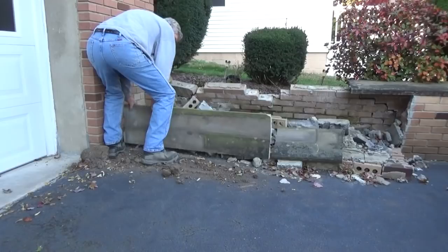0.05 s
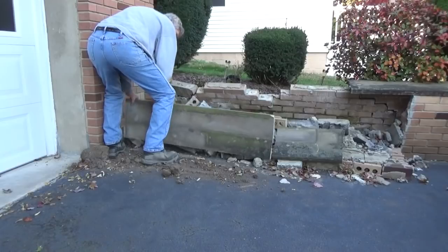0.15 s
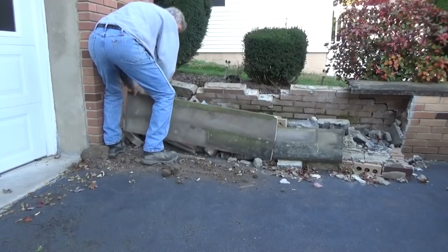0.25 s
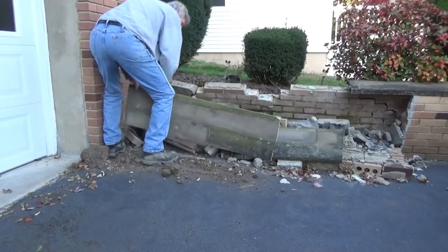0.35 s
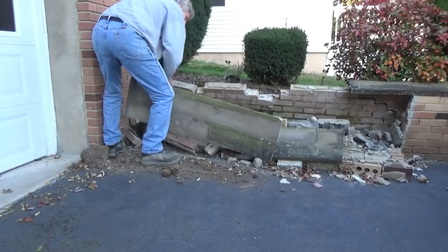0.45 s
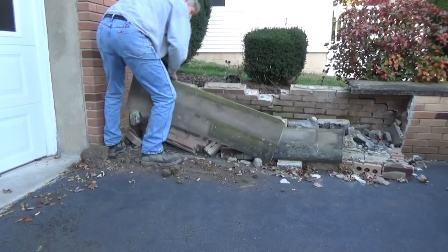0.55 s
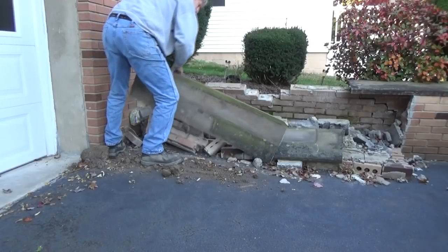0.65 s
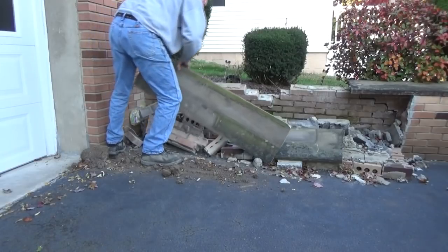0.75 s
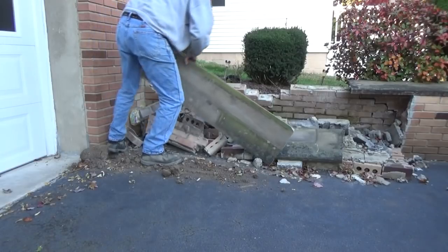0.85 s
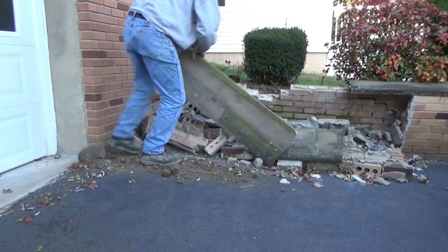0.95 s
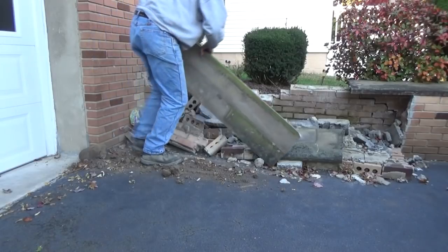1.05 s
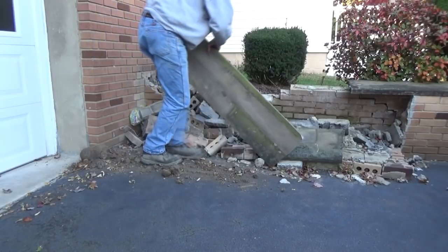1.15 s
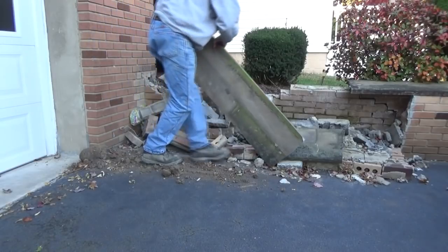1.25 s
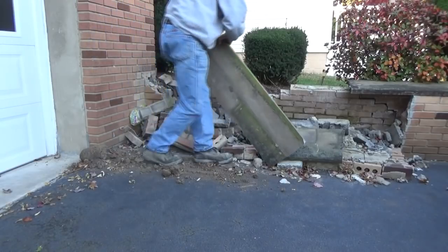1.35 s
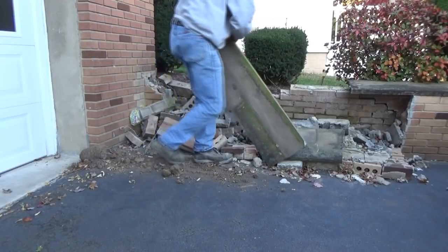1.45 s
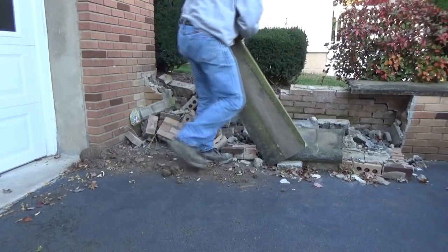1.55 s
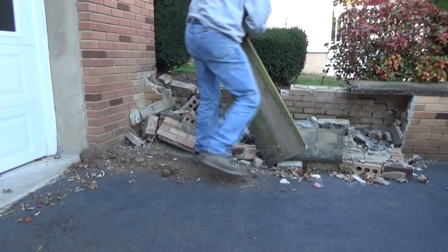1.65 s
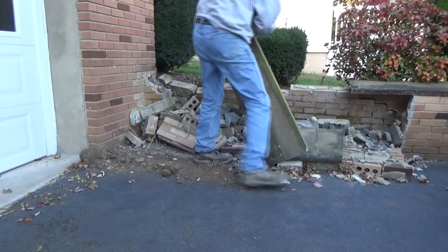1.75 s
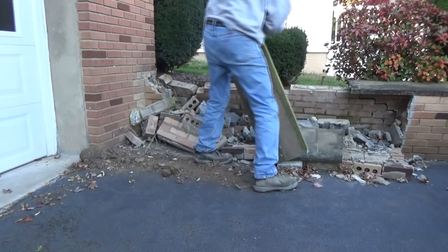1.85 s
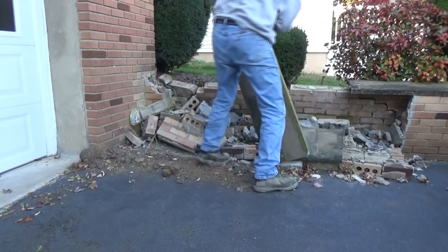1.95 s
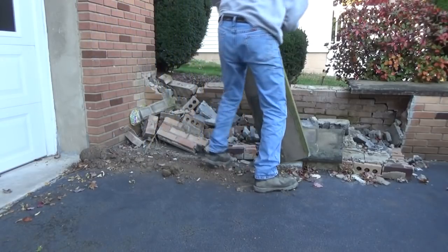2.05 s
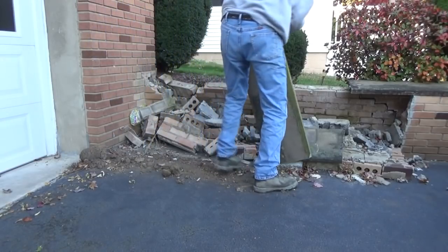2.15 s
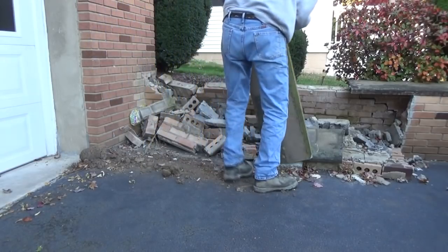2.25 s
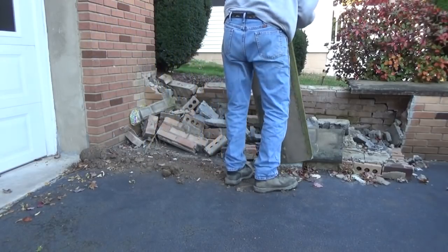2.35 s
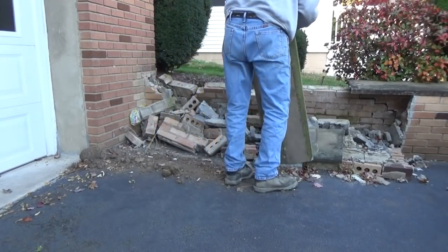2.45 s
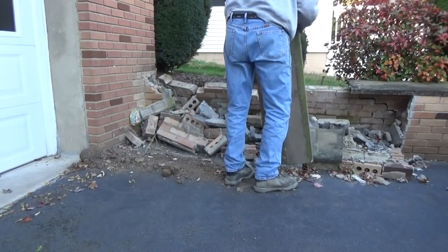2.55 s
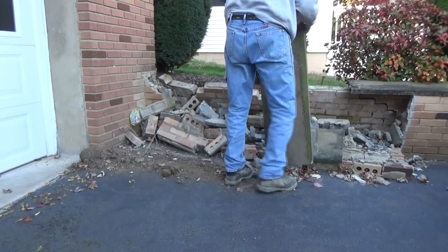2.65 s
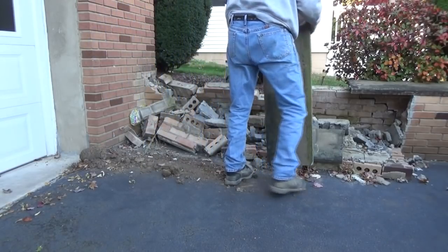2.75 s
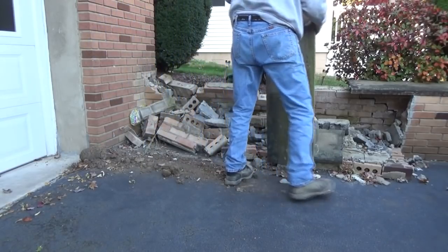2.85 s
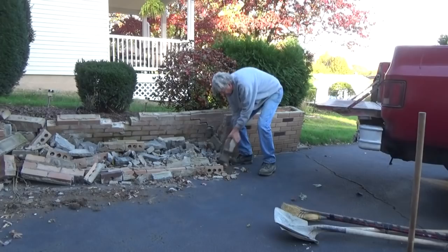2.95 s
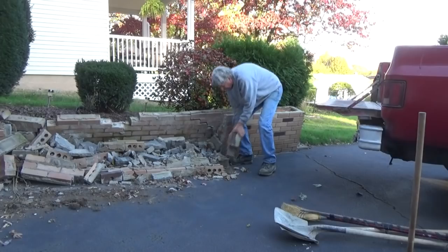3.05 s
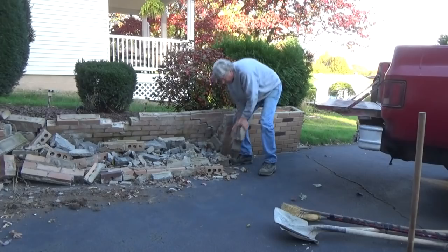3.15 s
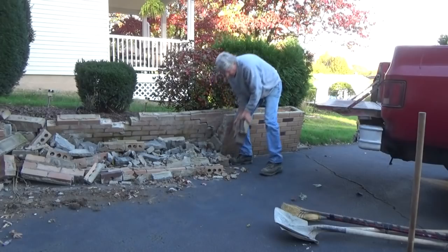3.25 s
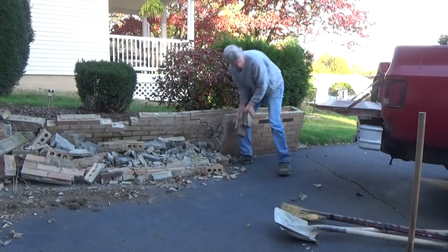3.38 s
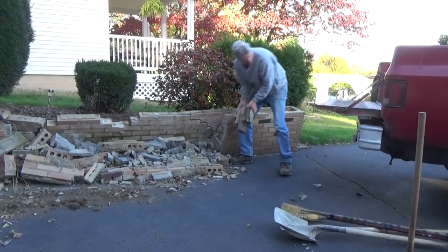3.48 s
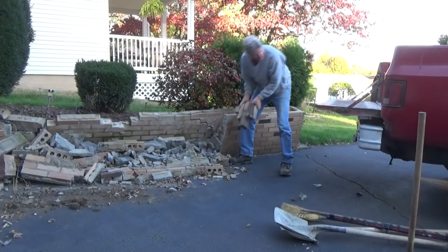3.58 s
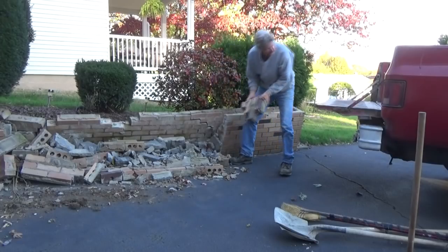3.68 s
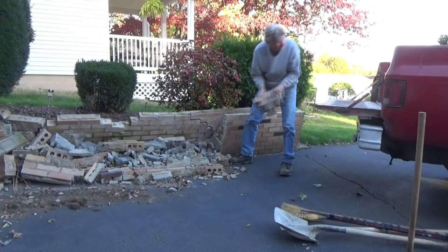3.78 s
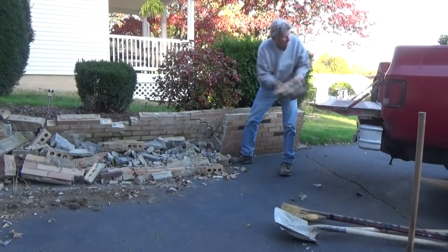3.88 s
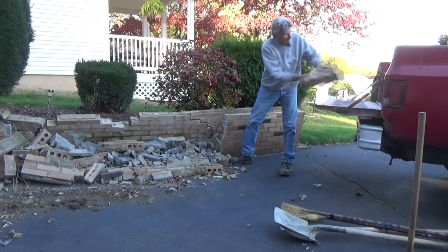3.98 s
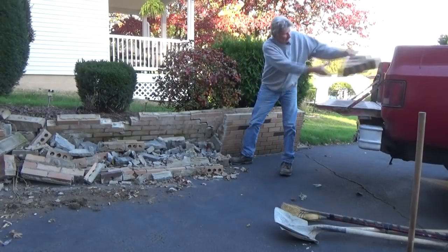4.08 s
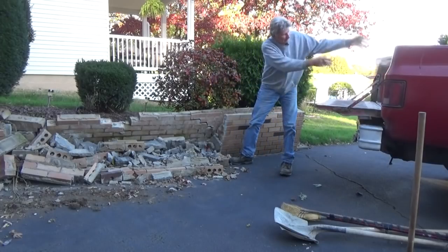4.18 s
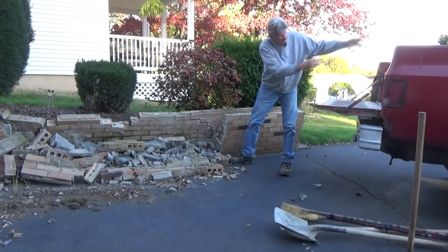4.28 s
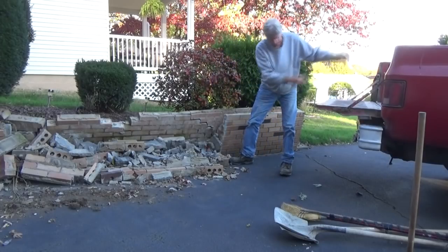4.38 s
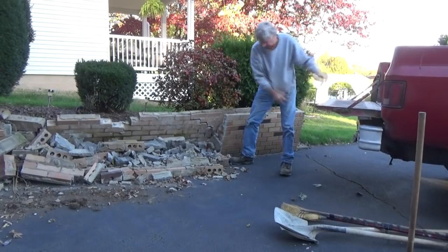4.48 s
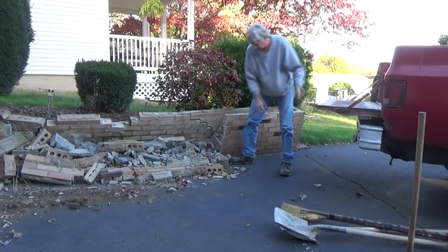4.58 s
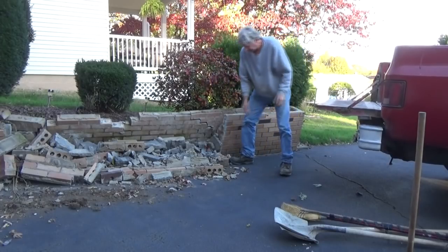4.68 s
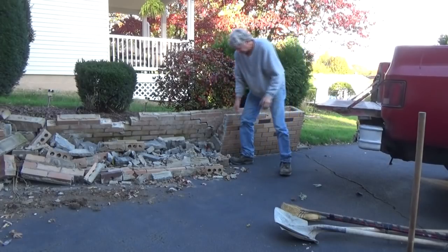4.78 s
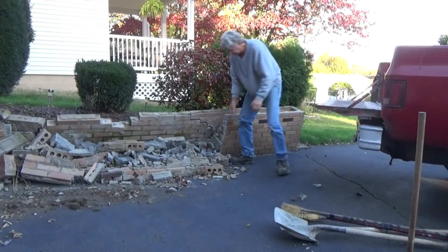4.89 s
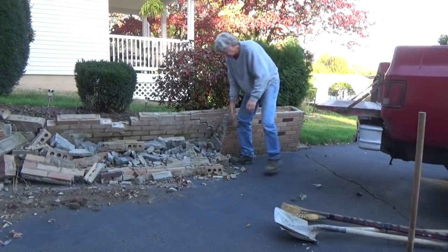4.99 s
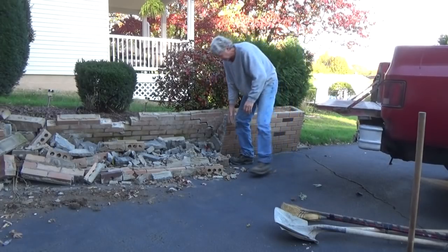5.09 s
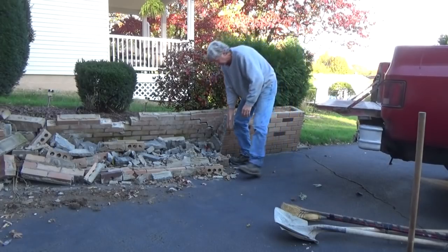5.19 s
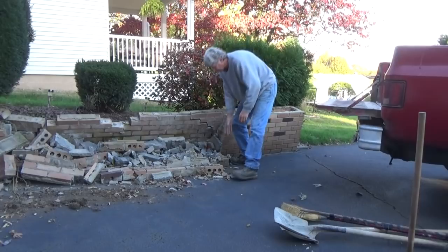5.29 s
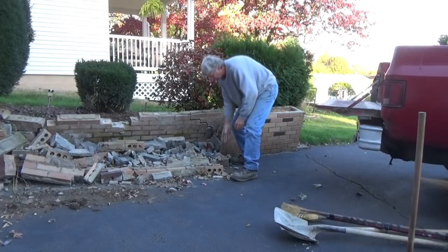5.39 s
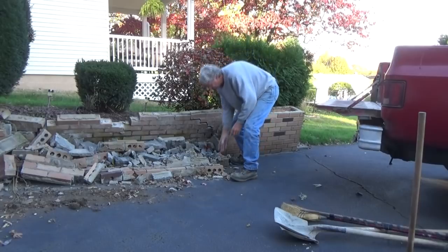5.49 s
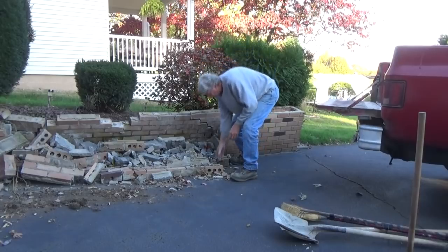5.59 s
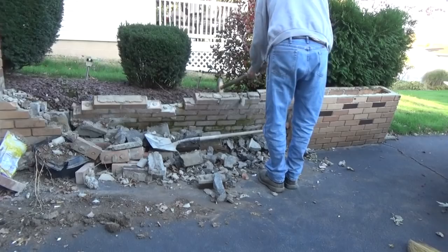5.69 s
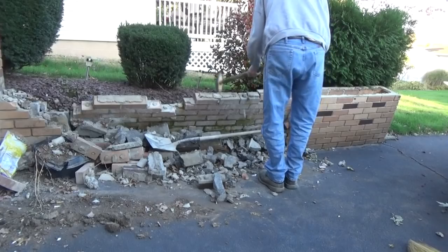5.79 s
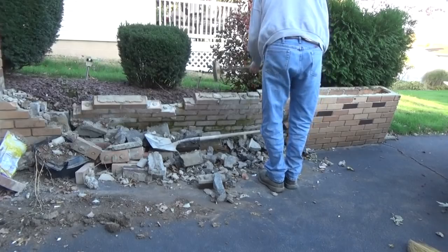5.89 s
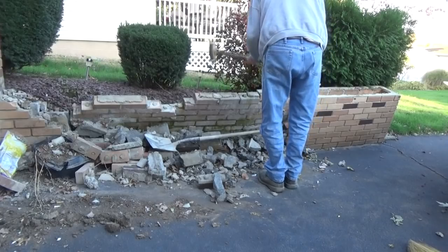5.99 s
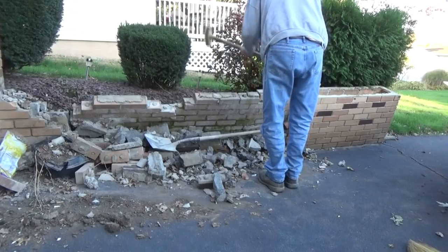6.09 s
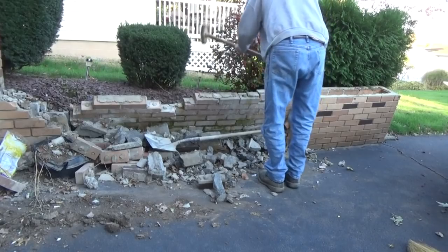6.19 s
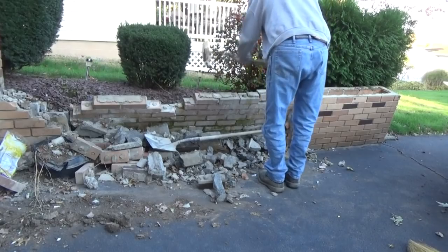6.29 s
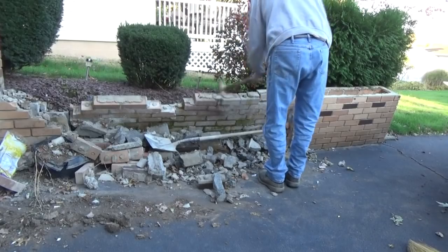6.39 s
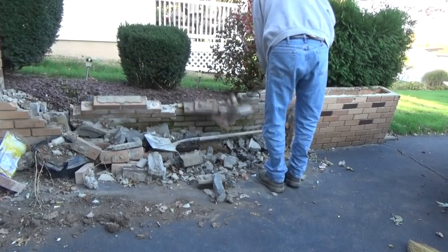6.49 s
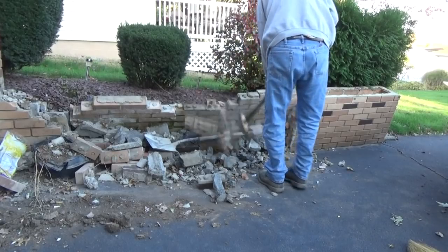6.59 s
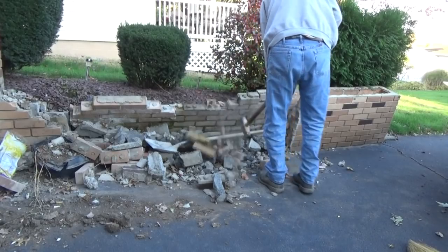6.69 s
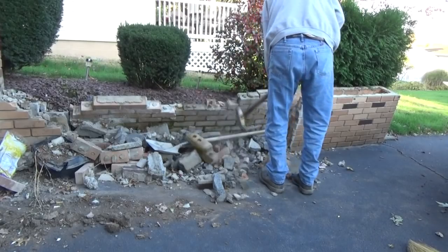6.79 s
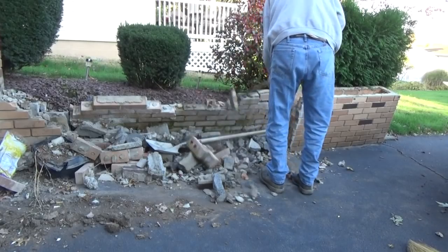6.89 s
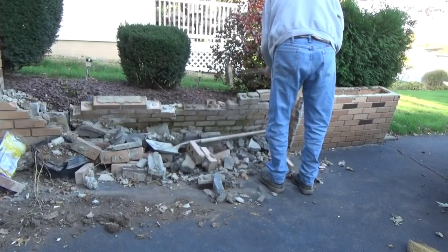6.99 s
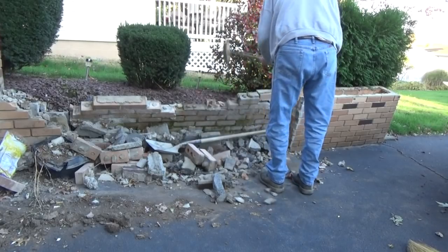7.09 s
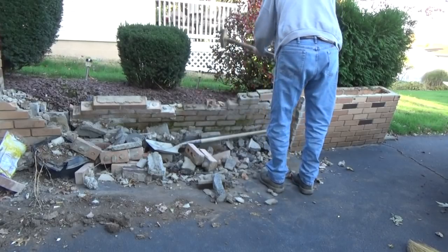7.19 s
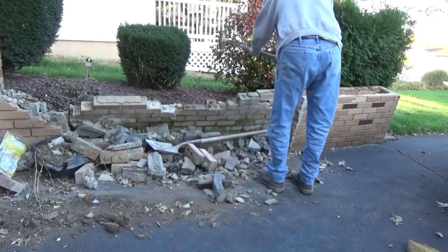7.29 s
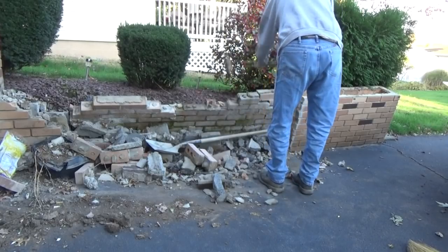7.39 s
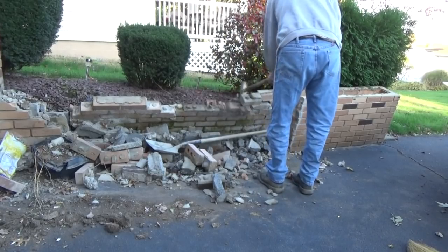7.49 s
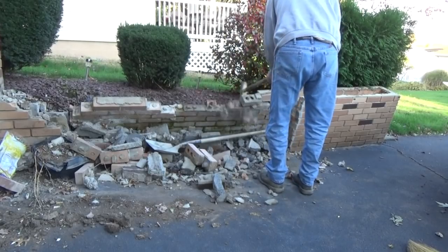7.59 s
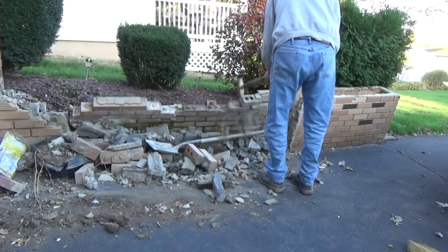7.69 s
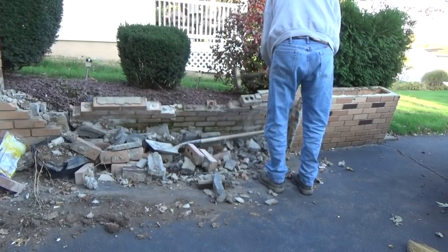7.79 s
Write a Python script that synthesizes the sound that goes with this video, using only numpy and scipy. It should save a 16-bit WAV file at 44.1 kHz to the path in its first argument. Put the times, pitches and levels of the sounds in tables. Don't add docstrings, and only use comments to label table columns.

```python
import sys
import numpy as np
from scipy import signal
from scipy.fft import rfft, irfft
from scipy.io import wavfile
from scipy.ndimage import uniform_filter1d

SR = 44100
rng = np.random.default_rng(int(sys.argv[2]) if len(sys.argv) > 2 else 0)


def digitize_waveform(pressure):
    field = np.atleast_2d(pressure).T
    bounded = np.clip(field, -1, 1)
    quanta = np.round(bounded * 32767).astype(np.int16)
    wavfile.write(sys.argv[1], SR, quanta)


def linear_from_db(decibels):
    return 10 ** (np.asarray(decibels, float) / 20)


N = 345744


def evened(x):
    return x / np.sqrt(np.mean(x ** 2) + 1e-20)


def read(points, hz):
    f, value = np.transpose(points)
    return np.interp(np.log(hz + 1), np.log(f + 1), value)


def add(mix, s, sound):
    part = mix[..., round(s * SR):][..., :sound.shape[-1]]
    part += sound[..., :part.shape[-1]]


def panned(x, db):
    return np.array([x * linear_from_db(db / 2), x * linear_from_db(-db / 2)])


def coloured(x, points):
    hz = abs(np.fft.fftfreq(2048, 1 / SR))
    log_gain = np.log(linear_from_db(np.maximum(read(points, hz), -90)))
    taps = np.fft.ifft(np.exp(np.conj(signal.hilbert(log_gain)))).real[:1024]
    return evened(signal.oaconvolve(x, taps)[:N])


def resonant(x, peaks):
    out = np.zeros(N)
    for hz, width, db in peaks:
        b, a = signal.iirpeak(hz, hz / width, SR)
        once = signal.lfilter(b, a, x)
        out += linear_from_db(db) * signal.lfilter(b, a, once)
    return evened(out)


def impacts(per_s, spread_db):
    chance, size, sign = rng.random((N, 3)).T
    heights = linear_from_db(-spread_db * np.log(size + 1 / 50)) * np.sign(sign - 0.5)
    return evened((chance < per_s / SR) * heights)


def grains(level_db, lo_hz, hi_hz, cycles, per_s, spread_db, count=14):
    struck = impacts(per_s, spread_db) * linear_from_db(level_db)
    piece = rng.integers(0, count, N)
    out = np.zeros(N)
    for k, hz in enumerate(np.geomspace(lo_hz, hi_hz, count)):
        turns = np.arange(1500) * hz / SR
        chime = np.exp(-turns / cycles) * np.sin(2 * np.pi * turns)
        out += signal.oaconvolve(struck * (piece == k), chime / np.linalg.norm(chime))[:N]
    return out


def ring(hz, db, t60):
    t = np.arange(round(t60 * SR)) / SR
    return linear_from_db(db - 60 * t / t60) * np.sin(2 * np.pi * hz * t)


def swells(rows, order, rise_fall, sudden=()):
    t = np.arange(0, N + 16, 16) / SR
    power = 1e-12
    for row in rows:
        start, hold = row[:2]
        db = row[2] + (row[order] if order > 2 else 0)
        at_crack = any(abs(start - crack[0]) < 1 / 250 for crack in sudden)
        rise = 5000 if at_crack else rise_fall[0]
        slope_db = rise * np.maximum(start - t, 0) + rise_fall[1] * np.maximum(t - start - hold, 0)
        power = power + linear_from_db(db - slope_db) ** 2
    return np.interp(np.arange(N) / SR, t, 10 * np.log10(power))


# (from t/s, wash level/dB, engine drone level/dB)
STANDPOINTS = [
    (0, -40, -96),
    (0.096, -47, -47),
    (2.965, -46.5, -62),
    (5.693, -46.5, -56),
]
# (f/Hz, level/dB per Hz)
WASH_SPECTRUM = [(12, -36), (20, -10), (99, 0.5), (287, -8.5), (789, -8.5), (1310, -11.5), (3390, -22.5),
                 (15000, -68)]
# (f/Hz, level/dB per Hz)
HISS_SPECTRUM = [(1500, -19), (4000, -1), (7000, -1.5), (10500, -0.5), (16000, -4)]
# (f/Hz, width/Hz, level/dB)
DRONE_MODES = [(75.5, 22, 1), (43, 15, -5.5)]
# (f/Hz, coherence/1)
COHERENCE = [(60, 1), (240, 1), (950, 0.67), (3770, 0.73), (15000, 0.97)]


def traffic():
    hz = np.fft.rfftfreq(N, 1 / SR)
    a, b, c, d = rng.standard_normal((len(hz), 4)).T
    same = np.clip(read(COHERENCE, hz), -1, 1)
    left = a + 1j * b
    right = same * left + np.sqrt(1 - same ** 2) * (c + 1j * d)
    field = np.array([left, right])
    starts, wash_db, drone_db = np.transpose(STANDPOINTS)
    place = np.maximum(np.searchsorted(starts, np.arange(N) / SR) - 1, 0)
    wash = evened(irfft(field * linear_from_db(read(WASH_SPECTRUM, hz)), N)) * linear_from_db(wash_db[place])
    hiss = evened(irfft(field * linear_from_db(read(HISS_SPECTRUM, hz)), N)) * linear_from_db(-59.0 - 4.5 * (place == 0))
    drone = resonant(rng.standard_normal(N), DRONE_MODES) * linear_from_db(drone_db[place])
    return wash + hiss + drone


# (t/s, f/Hz, level/dB)
UPPER_GLIDE = [
    (3.92, 3950, -75),
    (3.95, 3930, -64),
    (4.1, 3720, -61),
    (4.2, 3600, -62),
    (4.31, 3340, -63),
    (4.35, 3240, -76),
]
# (t/s, f/Hz, level/dB)
LOWER_GLIDE = [
    (3.88, 2960, -75),
    (4.02, 2870, -62),
    (4.12, 2830, -65),
    (4.18, 2770, -59),
    (4.3, 2670, -65),
    (4.36, 2640, -76),
]


def glides():
    out, t = np.zeros((2, N)), np.arange(N) / SR
    for rows in UPPER_GLIDE, LOWER_GLIDE:
        s, hz, db = np.transpose(rows)
        slow_noise = uniform_filter1d(rng.standard_normal((2, N)), 900)
        flutter = 1 + 0.3 * np.array([evened(side) for side in slow_noise])
        level = linear_from_db(np.interp(t, s, db, -200, -200) + 4.5)
        phase = 2 * np.pi * np.cumsum(np.interp(t, s, hz)) / SR
        out += flutter * level * np.sin(phase)
    return out


# (t/s, roll/s, boom level/dB, panel level/dB re boom, rattle level/dB re boom)
BED_STRIKES = [
    (4.513, 0.091, -13, -0.5, -7),
    (4.625, 0.098, -11, -11, -18.5),
    (4.7, 0.12, -11.5, -10, -19.5),
    (4.887, 0.03, -20, -6, -17.5),
    (4.987, 0.017, -12.5, -4.5, -20),
    (5.047, 0.012, -20.5, -6.5, -5),
    (5.128, 0.0081, -33, -16, 3.5),
    (5.206, 0.064, -36, -3.5, -6),
    (5.3, .2, -69, 12, -5),
]
# (f/Hz, width/Hz, level/dB)
FLOOR_MODES = [(62.3, 190, -18), (130.2, 47, -8), (174.7, 57, 1), (238, 87, -9.5)]
# (f/Hz, width/Hz, level/dB)
PANEL_MODES = [(372.4, 57, 4), (526, 56, 0.5), (533, 79, -22), (712, 140, -4), (864, 114, -5),
               (1008, 120, -8.5), (1410, 570, -16)]
# (f/Hz, level/dB per Hz)
RATTLE_SPECTRUM = [(590, -6), (1000, -4), (2310, -11.5), (3850, -14.5), (4720, -18.5), (7950, -25),
                   (15000, -42)]


def trailer():
    strikes = impacts(per_s=400, spread_db=1.0)
    clumps_db = 2.2 * evened(uniform_filter1d(rng.standard_normal(N), 400))
    boom_db = swells(BED_STRIKES, order=2, rise_fall=(6000, 116))
    panels_db = swells(BED_STRIKES, order=3, rise_fall=(9400, 146))
    rattle_db = swells(BED_STRIKES, order=4, rise_fall=(11000, 214)) + clumps_db
    boom = resonant(strikes, FLOOR_MODES) * linear_from_db(boom_db)
    panels = resonant(strikes, PANEL_MODES) * linear_from_db(panels_db)
    rattle = coloured(impacts(per_s=2200, spread_db=0.0), RATTLE_SPECTRUM) * linear_from_db(rattle_db)
    return panned(boom + panels + rattle, 1.8)


# (t/s, hold/s, wall level/dB, crack level/dB re wall, ground level/dB re wall)
HAMMER_BLOWS = [
    (6.48, 0.035, -16, -3.5, -5.5),
    (7.56, .03, -15.5, -5.5, -9.5),
]
# (f/Hz, width/Hz, level/dB)
WALL_MODES = [(322, 270, -5), (457, 214, 5), (672, 110, 5.5), (935, 350, -1.5), (1150, 600, -3)]
# (f/Hz, level/dB per Hz)
MORTAR_SPECTRUM = [(710, -5), (1200, -7), (1530, -15), (2160, -3), (5070, -13), (9050, -18), (14600, -25),
                   (16300, -98)]


def blows():
    wall_db = swells(HAMMER_BLOWS, order=2, rise_fall=(9300, 180))
    crack_db = swells(HAMMER_BLOWS, order=3, rise_fall=(14000, 143))
    ground_db = swells(HAMMER_BLOWS, order=4, rise_fall=(3900, 143))
    ground_modes = [(95, 40, 5.7), (182, 59, 12.0)]  # (f/Hz, width/Hz, level/dB)
    wall = resonant(impacts(per_s=530, spread_db=1.0), WALL_MODES) * linear_from_db(wall_db)
    crack = coloured(impacts(per_s=5000, spread_db=3.0), MORTAR_SPECTRUM) * linear_from_db(crack_db)
    ground = resonant(rng.standard_normal(N), ground_modes) * linear_from_db(ground_db)
    return panned(wall + crack + ground, 1.2)


# (f/Hz, level/dB, t60/s)
HEAD_MODES = [(8800, -34.5, 0.59), (12250, -49, .28)]


def hammer_head():
    out = np.zeros((2, N))
    for blow in HAMMER_BLOWS:
        for mode in HEAD_MODES:
            add(out, blow[0], panned(ring(*mode), 3.5))
    return out


# (t/s,
# f/Hz, level/dB, t60/s)
SINGLE_RINGS = [(5.79, 2950, -29.5, 0.092), (6.057, 2950, -22, 0.042), (6.844, 1250, -27, 0.3),
                (6.855, 856, -18, 0.26), (5.79, 6000, -34, .05), (6.732, 1180, -14, 0.05),
                (6.765, 1800, -16, 0.07), (7.414, 6200, -23.5, 0.015), (4.99, 417, -12, 0.17),
                (4.995, 520, -16, 0.15), (5.773, 6100, -36, .04), (5.717, 4400, -32, .03),
                (5.716, 8200, -32, .025), (5.865, 3400, -42, .08), (6.055, 4400, -26, .04),
                (6.07, 3000, -28, .09), (6.31, 4600, -30, .04), (6.378, 3000, -35, .05),
                (6.731, 600, -15, .08), (6.769, 3200, -18, .04), (6.712, 3200, -19, .06),
                (6.72, 4050, -22, .05), (6.81, 2223, -14, .35), (6.8, 3750, -22, .08), (6.995, 3650, -22, .03),
                (7.17, 3050, -27, .08), (7.18, 3600, -24, .07), (7.185, 3300, -24, .06),
                (7.208, 4300, -26, .04), (7.516, 3500, -36, .04), (5.349, 2600, -26, .1),
                (5.38, 2600, -40, .12), (2.55, 2900, -43, .35), (2.5, 1850, -44, .5), (2.88, 450, -42, .12),
                (2.07, 1550, -28, .08), (1.245, 1350, -30, .08), (1.18, 900, -27, .06), (7.575, 400, -18, .2),
                (6.795, 340, -20, .3), (7.818, 1600, -11, .1), (7.818, 2562, -15, .06),
                (7.818, 3400, -18, .03), (6.74, 2400, -16, .05), (6.755, 1600, -17, .05),
                (6.83, 5500, -20, .04), (7.205, 300, -27, .1), (4.1, 1780, -56, .6), (7.585, 520, -17, .2),
                (4.526, 380, -13, .1)]
# (f/Hz, level/dB, t60/s)
LONG_BRICK_MODES = [(554, -21, 0.46), (730, -16.5, 0.36), (1760, -24, 0.062), (2223, -11, 0.29),
                    (2606, -20, 0.17), (3000, -20, .07), (5300, -21, 0.06)]
# (f/Hz, level/dB, t60/s)
SHORT_BRICK_MODES = [(860, -26, .2), (1200, -23, .05), (1630, -17, .08), (1820, -14, 0.06), (2090, -15, .1),
                     (2300, -18.5, 0.11), (2690, -24, 0.074), (2700, -20, 0.095)]


def bricks():
    out = np.zeros((2, N))
    for s, hz, db, t60 in SINGLE_RINGS:
        add(out, s, panned(ring(hz, db, t60), 1.6))
    long_landings = [(6.795, -1)]  # (t/s, level/dB)
    short_landings = [(7.779, -2.5), (7.817, -0.5)]
    for modes, landings in (LONG_BRICK_MODES, long_landings), (SHORT_BRICK_MODES, short_landings):
        for s, fall_db in landings:
            for hz, db, t60 in modes:
                add(out, s, panned(ring(hz, db + fall_db, t60), 1.6))
    return out


# (t/s, peak level/dB, f/Hz, t60/s)
LUMP_THUDS = [(0.204, -33, 347, 0.062), (0.532, -38, 195, 0.14), (0.816, -32, 754, 0.14),
              (0.931, -35, 885, 0.08), (1.176, -25, 480, 0.064), (1.418, -27, 196, 0.046),
              (1.974, -29, 250, 0.085), (2.042, -28, 683, 0.024), (5.703, -21.5, 184, 0.059),
              (6.783, -30, 229, 0.092), (1.023, -35, 199, .12), (1.882, -29, 291, .06),
              (2.045, -33, 151, .15), (2.38, -34, 151, .15), (1.312, -37, 261, .08)]


def thuds():
    out = np.zeros((2, N))
    for s, db, hz, t60 in LUMP_THUDS:
        add(out, s, panned(ring(hz, db + 4.0, t60) + ring(hz * 1.6, db - 9, t60), 0.74))
    return out


# (t/s, peak level/dB, f/Hz)
SLAB_TICKS = [(0.0976, -36, 4870), (0.1259, -38, 4910), (0.1447, -37, 4910), (0.1844, -16, 9450),
              (0.3777, -40, 5100), (0.5172, -26, 2800), (0.5234, -20, 3010), (0.5993, -23, 2520),
              (0.9211, -26, 3170), (1.104, -31, 4910), (1.1808, -12, 7130), (1.2611, -16, 10270),
              (1.294, -17, 10440), (1.3609, -16, 10270), (1.4219, -9, 4260), (1.4662, -29, 3060),
              (1.4991, -31, 9950), (1.5081, -27, 9450), (1.5464, -34, 8230), (1.5839, -34, 9780),
              (1.6324, -31, 9930), (1.646, -29, 9450), (1.8647, -28, 8590), (1.8983, -8, 10160),
              (1.911, -12, 2930), (1.9792, -22, 5880), (2.0505, -18, 1610), (2.1404, -26, 9500),
              (2.2847, -17, 3490), (2.3174, -15, 3400), (2.3782, -17, 4910), (2.4196, -15, 8290),
              (2.4539, -22, 1850), (2.7734, -20, 3210), (2.9478, -32, 3230), (2.9676, -29, 5430)]
# (t/s, peak level/dB, f/Hz)
LATER_TICKS = [(5.3262, -13, 1890), (5.3301, -22, 1960), (5.3426, -24, 5660), (5.3504, -14, 2540),
               (5.7168, -21, 8050), (5.8364, -30, 9110), (5.9601, -26, 7430), (6.027, -26, 2430),
               (6.0469, -28, 2220), (6.086, -23, 5710), (6.1259, -23, 5430), (6.1646, -27, 4350),
               (6.1693, -23, 4310), (6.2089, -23, 10770), (6.2176, -18, 5920), (6.2628, -22, 4410),
               (6.3013, -26, 4460), (6.3107, -23, 4480), (6.6278, -22, 2990), (6.6973, -18, 7770),
               (6.7031, -13, 7800), (6.7313, -15, 2730), (6.7428, -8, 2520), (6.7599, -11, 2410),
               (6.7711, -8, 2580), (6.7818, -9, 2070), (6.8275, -7, 2220), (6.8378, -10, 2240),
               (7.0686, -15, 2800), (7.1357, -21, 5860), (7.1857, -15, 3380), (7.2083, -16, 4200),
               (7.2926, -30, 2800), (7.3919, -33, 3100), (7.431, -27, 5940), (7.4854, -30, 11300)]


def ticks():
    out, t = np.zeros(N), np.arange(800) / SR
    snap = np.exp(-t / 0.00012) * np.sin(2 * np.pi * 4500 * t)
    for s, db, hz in SLAB_TICKS + LATER_TICKS:
        tone = np.sin(2 * np.pi * hz * t)
        overtone = 0.4 * np.sin(2 * np.pi * min(hz * 1.9, 14000) * t)
        stone = np.exp(-t * hz / 3.5) * (tone + overtone)
        add(out, s, linear_from_db(db - 1.5) * (stone + 1.25 * snap))
    return panned(out, 0.4)


# (t/s, peak level/dB, centre f/Hz)
SLAB_KNOCKS = [(0.156, -9, 9700), (0.1758, -16.5, 9500), (0.205, -17, 7000), (.232, -23, 5540),
               (0.276, -20.5, 4560), (.341, -29, 5050), (0.9429, -14, 4860), (1.049, -28, 9500),
               (1.155, -22, 8500), (1.1785, -20, 2670), (1.2413, -14, 10000), (1.321, -13, 9800),
               (1.4222, -16, 3960), (1.661, -18.5, 9800), (1.675, -23, 10500), (1.8925, -4, 9700),
               (2.2413, -16, 7300), (2.297, -10, 3380), (2.3666, -22, 4000), (2.423, -22, 6000),
               (2.6872, -16.5, 9920), (2.7853, -11, 5300), (2.8097, -14, 5280)]
# (t/s, peak level/dB, centre f/Hz)
THROW_KNOCKS = [(2.9758, -24, 4630), (3.137, -19.5, 3770), (3.183, -12, 9000), (3.219, -22.5, 6000),
                (3.477, -24, 3950), (4.089, -22, 9750), (4.5125, -11, 1740), (5.0474, -15, 2020),
                (5.3222, -26, 3000), (5.3483, -10, 2490), (5.567, -25, 9900)]
# (t/s, peak level/dB, centre f/Hz)
BRICKWORK_KNOCKS = [(5.7028, -23, 2150), (5.7943, -24, 2830), (5.896, -23, 3060), (6.003, -22.5, 4020),
                    (6.0545, -9, 8060), (6.099, -17, 4430), (6.1875, -23, 3210), (6.2285, -15.5, 7500),
                    (6.3495, -11, 10670), (6.4778, -3.5, 1770), (6.668, -15.5, 2870), (6.7122, -6, 5100),
                    (6.768, -8, 2380), (6.9941, -14.5, 8800), (7.052, -19, 2340), (7.178, -12.5, 3300),
                    (7.2042, -15, 3520), (7.351, -23.5, 2500), (7.3995, -19, 10070), (7.4715, -22, 5240),
                    (7.5558, -6, 2400), (7.7789, -4, 2020), (7.818, -7, 2300)]


def knocks():
    out, t = np.zeros((2, N)), np.arange(2000) / SR
    cracks = SLAB_KNOCKS + THROW_KNOCKS + BRICKWORK_KNOCKS
    grits = rng.standard_normal((len(cracks), 2000))
    sides = rng.normal(0.4, 1.1, len(cracks))
    soft = signal.butter(2, 11000, fs=SR)
    contact = 2.24 * np.exp(-t / 0.00013) * np.sin(2 * np.pi * 5000 * t)
    for (s, db, hz), grit, pan_db in zip(cracks, grits, sides):
        body = evened(signal.lfilter(*signal.iirpeak(hz, 2.5, SR), grit))
        chime = np.sin(2 * np.pi * hz * t)
        burst = 0.88 * body + 0.24 * signal.lfilter(*soft, grit) + 0.6 * chime + contact
        t60 = 0.028 * (hz / 3000) ** -0.19
        add(out, s, panned(burst * linear_from_db(db - 8.5 - 60 * t / t60), pan_db))
    return out


# (t/s, hold/s, sand level/dB, chip level/dB re sand, lump level/dB re sand)
SLAB_SLIDES = [(.098, 0.27, -53, -17, -8), (.155, 0.087, -38.5, -31, -19), (.3, 0.01, -45.5, 5.5, 9),
               (.529, 0.018, -32, 2, -0.5), (.6, .14, -51, 7, 9.5), (.82, 0.066, -48, 5, 11),
               (.934, 0.015, -37.5, -2.5, 1.5), (.98, 0.045, -47.5, -0.5, 6), (1.05, 0.23, -45, -23, -21),
               (1.179, 0.0075, -33.5, 2, 3), (1.24, 0.18, -29.5, -10, -14), (1.45, 0.076, -41, -1, -2.5),
               (1.58, 0.13, -44.5, -21, -19), (1.76, 0.1, -46, -3.5, -0.5), (1.89, 0.011, -24, -14, -11.5),
               (1.97, 0.12, -32.5, -2, -7.5), (2.14, 0.2, -34, -8.5, -24), (2.28, .04, -31, -3.5, -13),
               (2.366, 0.061, -29.5, -7, -14.5), (2.5, 0.11, -56, 6, 4), (2.687, 0.014, -35, -5.5, -15),
               (2.75, 0.068, -43.5, -0.5, -2), (2.86, 0.063, -47.5, -2.5, 4.5)]
# (t/s, hold/s, sand level/dB, chip and lump level/dB re sand)
THROW_SLIDES = [(2.974, .01, -35, -5.5, -10.5), (3.02, 0.02, -42, -10, -13), (3.09, .01, -45.5, -3, -6),
                (3.146, 0.053, -34.5, -3.5, -15), (3.25, 0.15, -45.5, -9, -10),
                (3.388, 0.016, -35, -11.5, -25), (3.475, 0.033, -30.5, -15, -13.5),
                (4.04, 0.0091, -51, -16, -14), (4.088, 0.009, -41.5, -15, -25),
                (4.13, 0.044, -47.5, -3, -14), (5.326, 0.031, -43.5, 6, 1.5), (5.5, 0.0046, -48.5, -9, 8),
                (5.558, 0.013, -55, 2, 15)]
# (t/s, hold/s, sand level/dB, chip and lump level/dB re sand)
BRICKWORK_SLIDES = [(5.703, .025, -38.5, 4.5, 10.5), (5.76, 0.09, -44.5, -2.5, 0),
                    (5.896, 0.067, -39, -7, -9), (6.004, 0.015, -40, 2, -8),
                    (6.055, 0.013, -28.5, -12, -9.5), (6.1, 0.12, -41.5, -6.5, -10),
                    (6.2, 0.062, -34, -6.5, -6.5), (6.28, 0.038, -41, -7.5, -17),
                    (6.348, 0.0068, -36, -3.5, -7), (6.4, 0.047, -51.5, -4, -6),
                    (6.66, 0.012, -36, -12, -16), (6.707, 0.03, -21.5, -2.5, -25),
                    (6.738, 0.098, -23.5, 6, 0), (6.87, 0.096, -27.5, -2.5, -4.5),
                    (6.98, .2, -33, -2.5, -5), (7.239, 0.056, -43.5, 1, 5), (7.349, 0.0068, -44.5, 5.5, -4),
                    (7.4, .08, -43, -12, -11), (7.5, 0.025, -51, -8, 0), (7.781, 0.071, -31.5, 6, -9)]
# (f/Hz, level/dB per Hz)
SAND_SPECTRUM = [(1470, -20.5), (2500, -2), (3500, 0), (4160, 1), (7500, -2.5), (10300, 2.5), (15100, -8.5),
                 (16300, -12)]
# (f/Hz, width/Hz, level/dB)
SLAB_MODES = [(207.4, 22, 1.5), (369, 46, 0.5), (673, 61, 0), (802, 37, 2), (898, 110, -2),
              (1430, 270, -6.5), (1790, 140, -3)]


def rubble():
    slides = SLAB_SLIDES + THROW_SLIDES + BRICKWORK_SLIDES
    cracks = SLAB_KNOCKS + THROW_KNOCKS + BRICKWORK_KNOCKS + SLAB_TICKS[:1]
    sand_db = swells(slides, order=2, rise_fall=(300, 308), sudden=cracks)
    chips_db = swells(slides, order=3, rise_fall=(620, 360), sudden=cracks)
    lumps_db = swells(slides, order=4, rise_fall=(300, 230), sudden=cracks)
    clumps_db = 2.3 * evened(uniform_filter1d(rng.standard_normal(N), 500))
    sand = coloured(impacts(per_s=6000, spread_db=3.6), SAND_SPECTRUM) * linear_from_db(sand_db + clumps_db)
    flakes = grains(sand_db - 10.5, 3202, 9830, cycles=19.0, per_s=250, spread_db=6.0)
    clinks = grains(chips_db - 5, 800, 5500, cycles=12.0, per_s=300, spread_db=4.0)
    chips = grains(chips_db + 0.7 * clumps_db, 980, 3730, cycles=3.5, per_s=2500, spread_db=5.0)
    lumps = grains(lumps_db - 2, 170, 900, cycles=2.5, per_s=1800, spread_db=2.5)
    dragged = np.arange(N) / SR < 2.5
    slab = resonant(impacts(per_s=1800, spread_db=3.0), SLAB_MODES) * linear_from_db(lumps_db - 1.0) * dragged
    return panned(sand + flakes, -0.066) + panned(clinks + chips + lumps + slab, 0.2)


# (f/Hz, t60/s)
ECHO_DECAY = [(150, 0.053), (1000, 0.08), (4000, 0.17), (12000, 0.15)]
# (f/Hz, level/dB)
ECHO_SPECTRUM = [(60, -13.5), (400, -1), (6000, 4.5), (14000, -8)]


def echoes(x):
    taps = np.zeros((2, 16000))
    at = np.arange(200, 15980, 20) + rng.integers(0, 20, (2, 789))
    np.put_along_axis(taps, at, rng.choice([-1.0, 1.0], at.shape), 1)
    hz, t, z = signal.stft(taps, SR, nperseg=256)
    fall_db = read(ECHO_SPECTRUM, hz)[:, None] - 60 * t / read(ECHO_DECAY, hz)[:, None]
    tail = signal.istft(z * linear_from_db(fall_db), SR, nperseg=256)[1]
    return signal.fftconvolve(x[None], tail / np.linalg.norm(tail[0]), axes=1)[:, :N]


# (f/Hz, level/dB)
SIDE_SPECTRUM = [(30, -12), (70, -2), (200, -1.5), (450, 3.5), (1200, 3), (2500, -5), (8000, -4),
                 (15000, -24)]


def spread(x):
    taps = rng.standard_normal(5000) * np.exp(-np.arange(5000) / 1200)
    response = rfft(taps / np.linalg.norm(taps), N)
    hz = np.fft.rfftfreq(N, 1 / SR)
    side = irfft(rfft(x) * response * linear_from_db(read(SIDE_SPECTRUM, hz) - 7), N)
    return np.array([side, -side])


def scene():
    background = traffic() + glides()
    struck = trailer() + blows() + hammer_head() + bricks()
    work = struck + thuds() + ticks() + knocks() + rubble()
    middle = work.mean(0)
    return linear_from_db(1.0) * work + spread(middle) + linear_from_db(-13.5) * echoes(middle) + background


def low_pass(x):
    return signal.sosfilt(signal.butter(12, 15950, fs=SR, output="sos"), x)


# (f/Hz, level/dB)
MICROPHONE_RESPONSE = [(20, -16), (60, -0.5), (10500, -0.5), (12500, -5.5), (16000, -6.5), (17000, -30)]


def record(dry):
    hz = np.fft.rfftfreq(N, 1 / SR)
    heard = irfft(rfft(dry) * linear_from_db(read(MICROPHONE_RESPONSE, hz)), N)
    peak_db = 20 * np.log10(abs(heard).max(0) + 1e-6)
    fall = np.arange(N) * 440.0 / SR
    held_db = np.maximum.accumulate(peak_db + fall) - fall
    over_db = np.maximum(held_db + 2.5, 0)
    limited = heard / linear_from_db(0.28 * uniform_filter1d(over_db, 30))
    finished = 0.65 * np.tanh(limited / 0.79)
    return low_pass(finished)


dry = scene()
out = record(dry)
digitize_waveform(out)
```